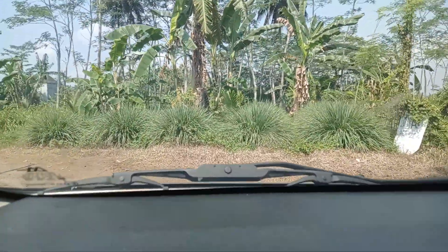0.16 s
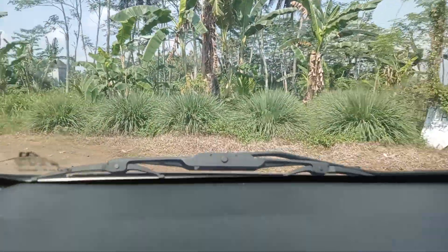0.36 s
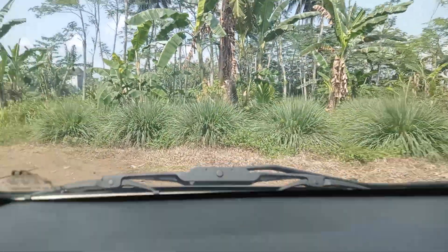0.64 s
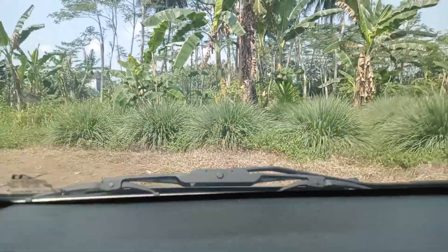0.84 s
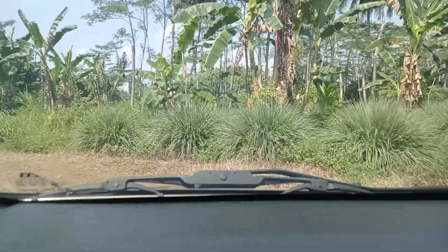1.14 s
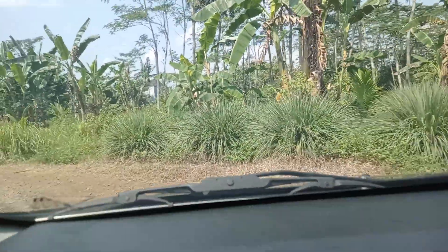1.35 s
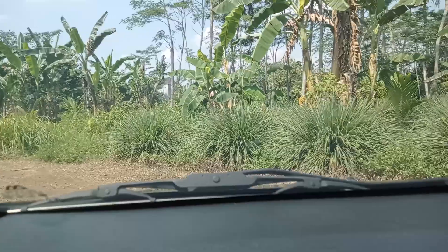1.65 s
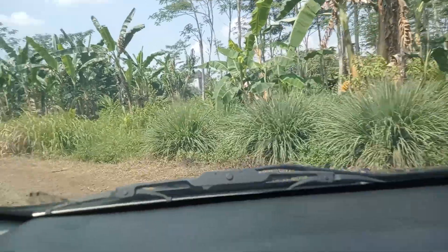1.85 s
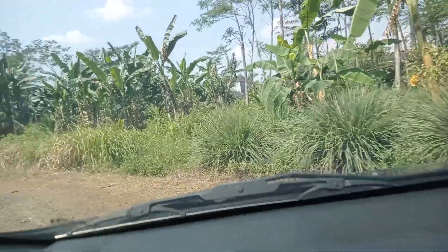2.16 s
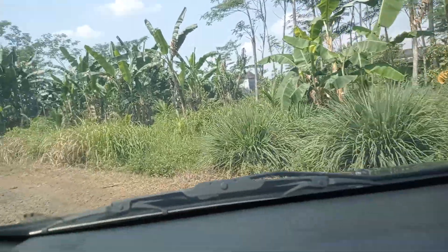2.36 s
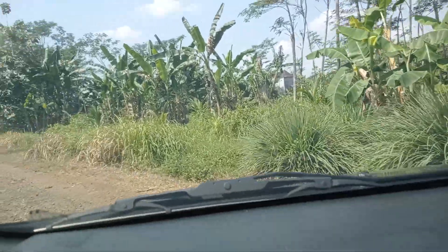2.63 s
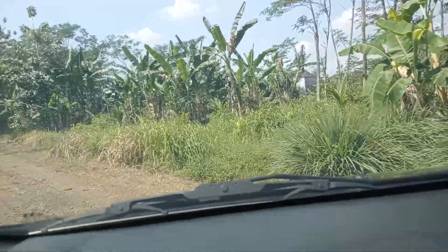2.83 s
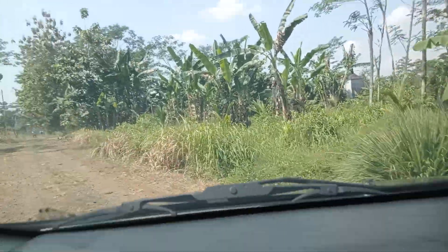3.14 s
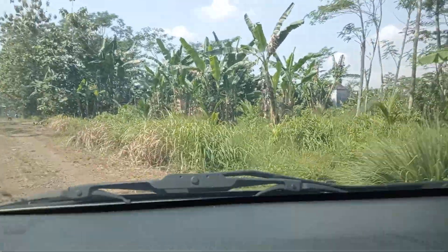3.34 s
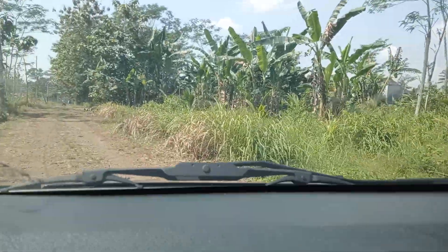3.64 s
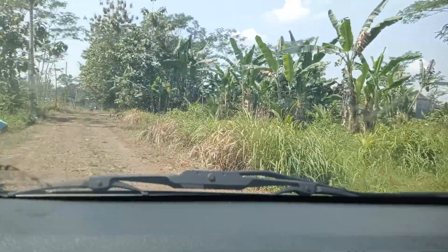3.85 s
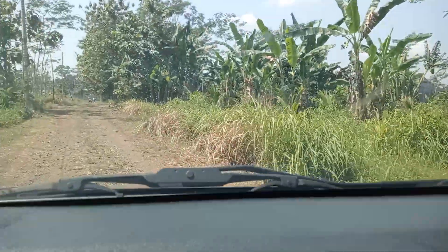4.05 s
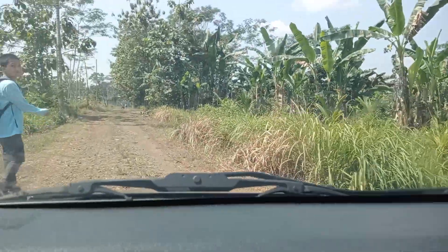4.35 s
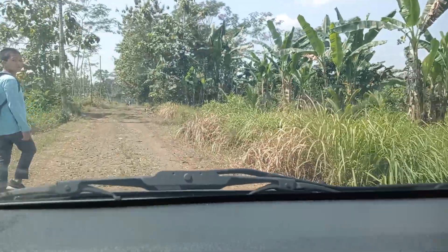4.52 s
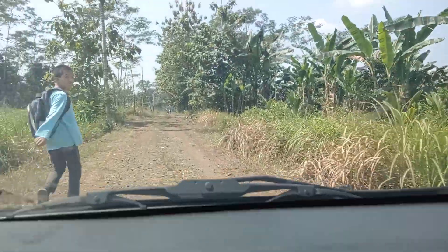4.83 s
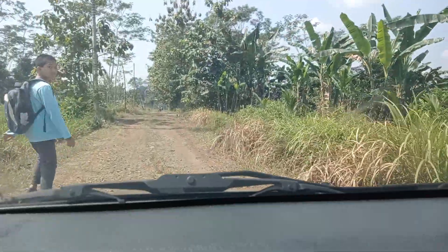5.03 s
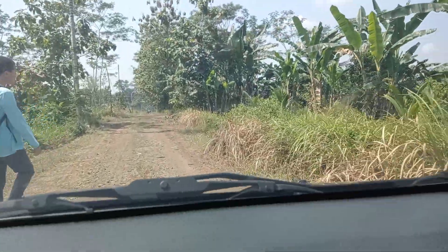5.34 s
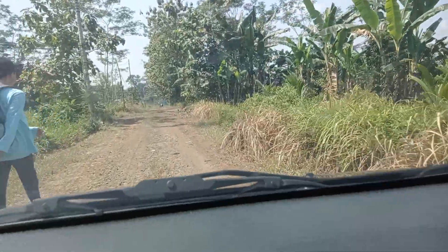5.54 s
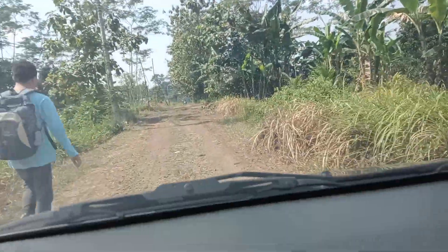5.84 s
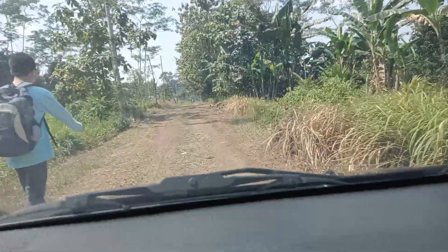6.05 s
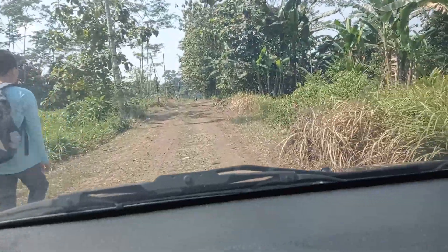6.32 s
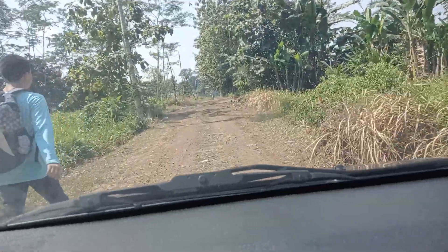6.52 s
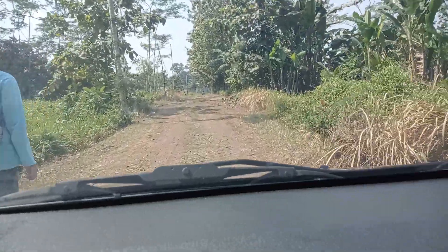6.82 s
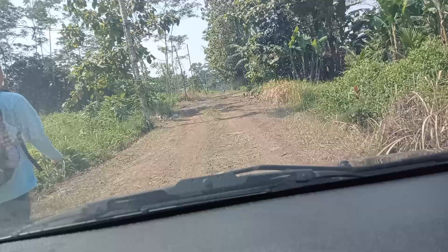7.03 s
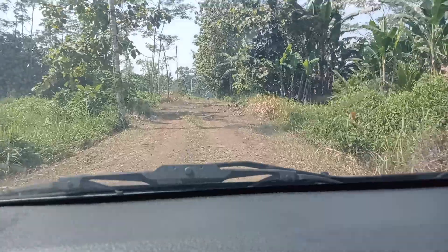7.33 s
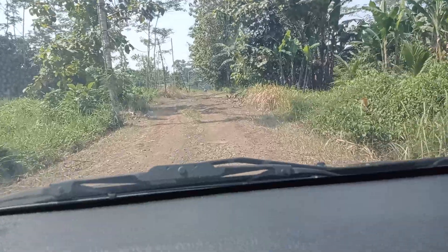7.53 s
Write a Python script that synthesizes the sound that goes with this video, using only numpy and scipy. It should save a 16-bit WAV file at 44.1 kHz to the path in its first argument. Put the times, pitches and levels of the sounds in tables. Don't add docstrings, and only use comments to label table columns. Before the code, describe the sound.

Slow car interior on a stony track: boomy body rumble and humming dashboard, crackling gravel, dull knocks, plastic trim ticks and small bright clinks.

```python
import sys
import numpy as np
from scipy import signal
from scipy.fft import rfft, irfft, next_fast_len
from scipy.io import wavfile
from scipy.ndimage import uniform_filter1d

SR = 44100
rng = np.random.default_rng(int(sys.argv[2]) if len(sys.argv) > 2 else 0)


def log_audio(samples):
    frames = np.atleast_2d(samples).T
    limited = np.clip(frames, -1, 1)
    pcm = np.round(limited * 32767).astype(np.int16)
    wavfile.write(sys.argv[1], SR, pcm)


def field_ratio(decibels):
    return 10 ** (np.asarray(decibels, dtype=float) / 20)


N = 338582
RUN_IN = 4096

# time in seconds, roughness as body shake in dB,
# loose grit as crunch in dB.
ROAD = [(0.0, -39, -56.5), (0.45, -34, -54.5), (0.83, -40.5, -55.5), (1.2, -31.5, -56), (1.6, -39, -54.5),
        (2.3, -42.5, -55), (2.9, -48, -56), (3.2, -45, -58), (3.48, -43, -53), (3.68, -36, -52),
        (4.3, -31, -51.5), (4.5, -31.5, -54), (4.83, -35.5, -49), (5.1, -30.5, -51.5), (6.2, -34, -53.5),
        (6.5, -35, -52.5), (7.08, -29.5, -52), (7.68, -29.5, -52.5)]


def rms_one(x):
    return x / np.sqrt(np.mean(x ** 2) + 1e-20)


def in_time(rows):
    s, *columns = np.transpose(rows)
    return [np.interp(np.arange(N) / SR, s, c) for c in columns]


def drift(rate):
    r = np.exp(-80 * np.pi * rate / SR)
    white = rng.standard_normal(N // 40 + 2002)
    slow = signal.lfilter([1], [1, -2 * r, r * r], white)[2000:]
    return np.interp(np.arange(N) / 40, np.arange(len(slow)), rms_one(slow))


def low_pass(x, hz):
    return signal.sosfilt(signal.butter(4, hz, "low", fs=SR, output="sos"), x)


def band(x, low_hz, high_hz):
    sos = signal.butter(2, [low_hz, min(high_hz, .49 * SR)], "band", fs=SR, output="sos")
    return signal.sosfilt(sos, np.append(x[-RUN_IN:], x))[RUN_IN:]


def resonate(x, hz, width_hz):
    r = np.exp(-np.pi * width_hz / SR)
    top = np.array([1, 0, -1]) * (1 - r * r) / 2
    return signal.lfilter(top, [1, -2 * r * np.cos(2 * np.pi * hz / SR), r * r], x)


def colour(x, spectrum):
    hz, level_db = np.transpose(spectrum)
    size = next_fast_len(N)
    grid = np.maximum(np.arange(size // 2 + 1) * SR / size, 1)
    gain = field_ratio(np.interp(np.log(grid), np.log(hz), level_db))
    return irfft(rfft(x, size) * gain, size)[:N]


def patchy_bands(spectrum, whites, patchy_db, flicker):
    whites = [colour(white, spectrum) for white in whites]
    lowest, highest = spectrum[0][0], spectrum[-1][0]
    edges = lowest * 2 ** np.arange(0, np.log2(highest / lowest) + .4, .5)
    together = drift(flicker)
    for k, (low, high) in enumerate(zip(edges, edges[1:])):
        if low < .45 * SR:
            patches = field_ratio(patchy_db * (0.14 * together + drift(flicker)))
            yield np.sqrt(low * high), patches * band(whites[k % 2], low, high)


def grains(per_s, spread_db):
    sizes = field_ratio(spread_db * np.minimum(rng.exponential(1, N), 5)) * rng.choice([-1, 1], N)
    return rms_one(sizes * (rng.random(N) < per_s / SR))


def bursts(times, peak_db, t60, rise_s):
    out = np.zeros(N)
    for s, db, decay in zip(times, peak_db, t60):
        at = int(s * SR)
        t = np.arange(min(int(.3 * SR), N - at)) / SR
        out[at:at + len(t)] += field_ratio(db - 60 * t / max(decay, .01)) * (1 - np.exp(-t / rise_s))
    return out


def struck(rows, width_hz, gain_db):
    out, shudder = np.zeros(N), rng.standard_normal((len(rows), SR // 5))
    fall = np.arange(SR // 5) / SR
    for (s, db, hz, t60), noise in zip(rows, shudder):
        push = noise * field_ratio(-60 * fall / max(t60, .01))
        ring = resonate(resonate(push, hz, width_hz), hz, 2.7 * width_hz)
        at = int(s * SR)
        out[at:at + len(ring)] += field_ratio(db + gain_db) * (ring / np.abs(ring).max())[:N - at]
    return out


def heaves(times, peak_db, lengths):
    t = np.arange(0, N + 32, 32) / SR
    power = sum(field_ratio(db) ** 2 * np.exp(-2 * np.abs(t - s) / max(length, .01))
                for s, db, length in zip(times, peak_db, lengths))
    return np.interp(np.arange(N) / SR, t, power)


def steadied(x, share, seconds):
    width = max(int(seconds * SR), 8)
    power = uniform_filter1d(uniform_filter1d(rms_one(x) ** 2, width), width)
    return rms_one(x / (power + 0.042) ** (share / 2))


def engine_hum():
    # note in Hz, width in Hz, level in dB rms.
    hum_notes = [(77.3, 26, -42.5), (208.2, 28, -50), (322.5, 32, -60), (536, 33, -63), (620, 41, -59.5),
                 (1110, 9.7, -74), (1788, 59, -68), (994, 30, -72), (2100, 66, -66.5), (3653, 78, -75),
                 (5500, 470, -82.5)]
    load_db = uniform_filter1d(in_time(ROAD)[1], size=SR // 2)
    white = rng.standard_normal(N)
    lines = np.zeros(N)
    for hz, width, db in hum_notes:
        lines += field_ratio(db) * rms_one(resonate(resonate(white, hz, width), hz, width))
    return lines * field_ratio(1.17 * (load_db - load_db.mean()))


def brushing():
    # start in seconds, length in seconds, level in dB rms, dullness in dB.
    swishes = [(0.28, 0.11, -65.5, -12), (1.074, 0.012, -62.5, 16.5), (1.083, 0.059, -70.5, 12),
               (1.321, 0.037, -71, 13), (1.434, 0.011, -64, -13), (5.2, 0.46, -76, -6),
               (2.1, 0.52, -76.5, -3), (1.698, .45, -76.5, -9), (2.663, 0.056, -72, 6),
               (3.73, 0.44, -69.5, 7), (4.16, 0.29, -67.5, 0), (4.62, 0.52, -70, -2),
               (6.552, 0.2, -69.5, 0), (6.988, 0.14, -67, 10), (5.923, 0.18, -63, -4),
               (6.825, 0.04, -65, 8), (6.945, 0.027, -59, 10)]
    white, out = rng.standard_normal(N), np.zeros(N)
    bright = rms_one(band(white, 6000, 12300) + 3.2 * resonate(white, 9200, width_hz=440))
    dull = rms_one(band(white, 1500, 3400))
    for s, length, db, dull_db in swishes:
        stroke = np.sin(np.pi * np.clip((np.arange(N) / SR - s) / length, 0, 1)) ** 0.21
        out += field_ratio(db) * stroke * (bright + field_ratio(dull_db) * dull)
    return out


def trim_ticks():
    # start in seconds, peak in dB, body relative to it in dB.
    tick_rows = [(0.1634, -50, 1), (0.3017, -44, 1), (0.4767, -54, 3), (1.076, -39, -20),
                 (1.5662, -53.5, 5), (1.6171, -51, 5), (1.8073, -50, 2), (1.8765, -51, 4),
                 (1.9764, -45, -1), (2.0287, -49, -23), (2.142, -51, -8), (3.235, -50, -20),
                 (4.0017, -52, -29), (4.146, -46, -17), (4.215, -46, -7), (4.255, -50, 1),
                 (4.317, -41, -22), (4.349, -41, -3), (4.4632, -47, 0), (4.19, -52, -9), (4.238, -50, -3),
                 (4.28, -51, -6), (4.37, -50, -1), (4.386, -54, -9), (0.573, -62, -6), (0.615, -60, 0),
                 (4.4991, -54, 2), (4.8857, -50, -7), (5.0269, -48, -14), (5.5548, -57, -9),
                 (5.7388, -62, -21), (5.9478, -58, 14), (6.4591, -56, -9), (6.5409, -53, 5),
                 (6.6178, -52, 7), (6.858, -57, 13)]
    s, db, body_db = np.transpose(tick_rows)
    stray = np.sort(rng.uniform(0, N / SR - .1, size=34))
    stray_db = -62.5 + 2.9 * np.minimum(rng.exponential(1, stray.shape), 2)
    s, db = np.append(s, stray), np.append(db, stray_db)
    body_db = np.append(body_db, rng.normal(-10.0, 3.2, stray.shape))
    t60 = 0.063 * field_ratio(2.5 * rng.standard_normal(s.shape))
    crackle = rng.standard_normal(N) + 0.28 * grains(4000, spread_db=-13.0)
    bright = rms_one(resonate(resonate(crackle, 9400, width_hz=1200), 9200, width_hz=2500))
    top = field_ratio(4) * rms_one(band(crackle, 13000, 14000))
    body = rms_one(band(crackle, 2700, 4800))
    out = bright * bursts(s, db, 0.8 * t60, rise_s=0.00063)
    out += top * bursts(s, db - 19, t60, rise_s=.001)
    out += body * bursts(s, db + body_db, t60, rise_s=0.001)
    return field_ratio(-8.5) * out


def pendant():
    # time in seconds, a millisecond before the touch, peak in dB, low ring relative to it in
    # dB.
    clink_rows = [(0.2435, -50, 4), (0.8389, -50.5, 2), (1.299, -54, 6.5), (1.4849, -68, 3),
                  (1.651, -58, 1), (3.296, -42, -0.5), (3.8267, -36.5, -0.5), (3.9153, -53, -15),
                  (4.3977, -35.5, -2), (4.4277, -61, 7), (4.6526, -52, -6), (4.9337, -43.5, 8),
                  (5.638, -46, 2), (6.302, -61, 5), (7.226, -49, 4.5), (7.3643, -56.5, 5.5)]
    # pitch in Hz, level in dB, t60 in seconds.
    metal_modes = [(3180, -15, 0.087), (3300, 0.5, 0.053), (3640, 7, 0.053), (3870, -10, 0.056),
                   (4410, -21, 0.052), (5760, -9, 0.042), (7160, -22, 0.032), (7640, -26, .04),
                   (7740, 2, 0.026), (7950, 2, 0.026), (8270, 6.5, 0.024), (8400, -13, .025),
                   (9600, 0, 0.019), (10300, -9, 0.018)]
    s, db, low_db = np.transpose(clink_rows)
    s = s + 0.001014
    chance = np.clip(rng.standard_normal((len(s), len(metal_modes))), -1.2, 1.2)
    chatter, white = grains(1500, spread_db=2.5), rng.standard_normal(N)
    out, decay = np.zeros(N), np.full(len(s), .05)
    for k, (hz, mode_db, t60) in enumerate(metal_modes):
        strength_db = db + low_db * (hz < 5000) + mode_db + 2.5 * chance[:, k]
        clicks = np.roll(chatter, 977 * k) * bursts(s, strength_db - 25, 1.4 * decay, rise_s=0.0001)
        clicks += 1e-18
        clicks[(s * SR).astype(int)] += field_ratio(strength_db - 7.5)
        r, w = field_ratio(-60 / (0.33 * t60 * SR)), 2 * np.pi * hz / SR
        out += (-1) ** k * signal.lfilter([0, np.sin(w)], [1, -2 * r * np.cos(w), r * r], clicks)
    crack_db = -64 + 0.6 * (db - db.mean())
    crack = field_ratio(-2.0) * rms_one(band(white, 12000, 14500))
    scrape = field_ratio(-39) * rms_one(band(white, 1800, 8700))
    out += crack * bursts(s, crack_db, .7 * decay, rise_s=.0004)
    out += scrape * bursts(s, db + 0.38 * low_db, 0.78 * decay, rise_s=0.00046)
    return out


def pebbles():
    # start in seconds, peak in dB, note in Hz, t60 in seconds.
    pebble_hits = [(0.3032, -42.5, 3840, 0.11), (1.079, -34, 3300, 0.027), (5.9486, -34.5, 2170, 0.04),
                   (6.357, -31, 3570, 0.015), (6.8548, -40, 2150, 0.037), (2.05, -41, 1200, 0.05),
                   (3.505, -39, 3050, 0.03), (3.546, -38, 1800, 0.04), (4.28, -39, 1300, 0.04),
                   (4.885, -32, 2000, 0.048), (7.04, -50, 2300, 0.07), (7.08, -35.5, 1800, 0.13),
                   (7.64, -34.5, 1340, 0.19)]
    return struck(pebble_hits, width_hz=330, gain_db=-5.0)


def gravel():
    # start in seconds, peak in dB, note in Hz.
    stone_breaks = [(0.095, -59, 5000), (0.1256, -64, 5170), (0.162, -53, 5500), (0.5, -40, 2210),
                    (0.535, -44, 2200), (0.614, -48, 3630), (0.974, -31, 700), (1.077, -45, 2000),
                    (1.38, -38, 1150), (1.431, -35, 1100), (1.487, -38, 900), (1.57, -41, 2050),
                    (1.755, -51, 2050), (1.775, -48, 2500), (1.886, -44, 1900), (3.865, -34, 2120),
                    (3.96, -39, 640), (4.005, -35, 1700), (4.035, -32, 1650), (4.045, -38.5, 3380),
                    (4.155, -43, 640), (4.1894, -54, 5030), (4.258, -41, 2050), (4.29, -35, 1900),
                    (4.531, -37, 1410), (4.675, -37, 630), (4.998, -43, 700), (5.1906, -51, 4570),
                    (5.59, -49, 760), (5.6635, -42, 3620), (5.49, -41, 1200), (5.67, -48, 2100),
                    (5.715, -35, 2040), (5.74, -36, 2210), (4.775, -41, 2150), (4.815, -35, 2080),
                    (4.737, -37, 2030), (5.15, -43, 2000), (4.21, -48, 3660), (0.777, -44, 1000),
                    (0.938, -38, 1590), (1.455, -43, 2300), (1.535, -41, 2600), (2.545, -45, 2300),
                    (2.56, -42, 1500), (3.504, -37, 1300), (5.949, -40.5, 1400), (6.665, -39, 1500),
                    (5.795, -42, 640), (6.219, -38, 620), (6.527, -38.5, 650), (6.827, -44, 1900),
                    (6.99, -48, 1200), (7.03, -54, 2100), (7.065, -33.5, 630), (7.09, -35, 560),
                    (7.334, -49, 600), (7.452, -62, 5400), (7.657, -33, 2020)]
    s, db, hz = np.transpose(stone_breaks)
    t60 = np.full(len(s), 0.088)
    return struck(np.transpose([s, db, hz, t60]), width_hz=330, gain_db=-7.0)


def grit():
    # frequency in Hz, level in dB per Hz.
    crunch_colour = [(470, -1.5), (800, -1), (1040, -8.5), (1130, -8), (1480, -7), (1780, -4), (1960, -5),
                     (2120, -3.5), (2350, -7.5), (3710, -13), (4700, -23), (5550, -29.5), (6500, -64),
                     (8450, -57), (14300, -120)]
    # frequency in Hz, level in dB per Hz.
    dust_colour = [(4500, -38), (6000, -9), (6600, -13.5), (7400, -10.5), (8300, -8), (9000, -3.5),
                   (9500, -1.5), (10100, -6), (10900, -5.5), (12500, -5.5), (15400, -3), (17000, -8.5)]
    crunch_db = in_time(ROAD)[1]
    swing_db = crunch_db - crunch_db.mean()
    clumps = field_ratio(2.94 * drift(20.0))
    whites = [0.56 * rng.standard_normal(N) + .5 * clumps * grains(1500, spread_db=1.0)
              for side in range(2)]
    crunch = sum(x for hz, x in patchy_bands(crunch_colour, whites, patchy_db=2.0, flicker=20.0))
    dust = colour(rng.standard_normal(N) + 0.74 * whites[0], dust_colour)
    air = signal.sosfilt(signal.butter(4, 11000, "high", fs=SR, output="sos"), dust)
    hiss = low_pass(dust, 11000)
    hiss_db = -74 + 0.91 * swing_db + 1.8 * drift(28.0) + .8 * drift(3.0)
    air_db = -86 + 0.2 * swing_db + 2.2 * drift(6.2)
    return field_ratio(crunch_db) * rms_one(crunch) + field_ratio(hiss_db) * rms_one(hiss) + field_ratio(air_db) * rms_one(air)


def suspension():
    # start in seconds, peak in dB, brightness relative to it in dB, t60 in seconds.
    knock_rows = [(0.489, -36, -7, 0.054), (0.774, -40, -18, 0.19), (0.936, -28.5, -20, 0.08),
                  (1.45, -38.5, -18, 0.27), (1.53, -32.5, -11.5, 0.065), (1.567, -38, -10, 0.063),
                  (1.76, -45, -3, 0.077), (2.142, -40, -21, 0.21), (2.524, -47, -8, 0.2),
                  (3.5, -39, -18, 0.28), (3.74, -34.5, -7, 0.09), (3.837, -28.5, -15, 0.091),
                  (4.02, -25, -28, 0.12), (4.042, -24, -32, 0.12), (4.172, -46, -7, 0.12),
                  (4.277, -33, -17, 0.13), (4.297, -30.5, -22, 0.13), (4.749, -36, -14.5, 0.17),
                  (4.828, -40, -1, 0.049), (5.147, -32, -18, 0.065), (5.434, -23, -39, 0.15),
                  (5.454, -41, -14, 0.15), (5.714, -34, -16, 0.15), (5.826, -27, -31, 0.22),
                  (6.13, -36, -26, 0.2), (6.614, -31, -22, 0.095), (6.662, -23.5, -31, 0.062),
                  (6.951, -34, -30, 0.087), (7.223, -24.5, -28, 0.16), (7.242, -35.5, -14, 0.14)]
    # low edge in Hz, high edge in Hz, level in dB.
    knock_parts = [(228, 898, 5), (1030, 2280, 11.5), (111, 690, -5)]
    # start in seconds, peak in dB, note in Hz, t60 in seconds.
    hollow_notes = [(0.176, -44.5, 1230, 0.083), (0.9384, -35.5, 1030, 0.11), (1.5598, -42, 1120, 0.09),
                    (1.566, -37, 640, 0.11), (1.76, -43.5, 800, 0.04), (2.14, -30, 486, 0.037),
                    (3.8354, -37, 1040, 0.13), (3.8637, -41, 1110, 0.052), (5.7132, -43, 970, 0.13),
                    (6.9549, -36.5, 1160, 0.17), (7.223, -38, 1030, 0.26)]
    s, db, bright_db, t60 = np.transpose(knock_rows)
    panel_hz = 329 * (1 + 0.18 * rng.standard_normal(len(s)))
    shudder = rng.standard_normal(N) + 1.46 * grains(450, spread_db=1.5)
    panels, trim, thump = [field_ratio(level_db - 6.5) * rms_one(band(band(shudder, low, high), low, high))
                           for low, high, level_db in knock_parts]
    out = panels * bursts(s, db, 0.79 * t60, rise_s=0.012)
    out += trim * bursts(s, db + bright_db, 0.8 * t60, rise_s=0.0037)
    out += thump * bursts(s, db - 11, 2.2 * t60, rise_s=0.0049)
    out += (panels + 0.13 * trim) * bursts(s, db - 8.5, 0.12 * t60, rise_s=0.0022)
    out += struck(np.transpose([s, db, panel_hz, t60]), width_hz=170, gain_db=-2.5)
    out += struck(hollow_notes, width_hz=120, gain_db=-1.0)
    return low_pass(out, 3500)


def body_shell():
    # frequency in Hz, level in dB per Hz.
    shell_colour = [(11, -87), (18, -33), (58, 1.5), (82, 2), (199, -8), (262, -16.5), (338, -12),
                    (461, -24), (523, -26), (606, -25), (767, -31.5), (990, -42), (1050, -55),
                    (1130, -38.5), (1400, -47), (1820, -65), (3080, -120)]
    # deepest point in seconds, boom in dB, length in seconds.
    rut_rows = [(0.036, -27.5, 0.024), (0.164, -30, 0.032), (0.327, -28.5, 0.11), (0.39, -32.5, 0.024),
                (0.496, -23, 0.017), (0.538, -24.5, 0.024), (0.634, -27.5, 0.025), (0.725, -29, 0.022),
                (1.07, -27.5, 0.019), (1.273, -31.5, 0.021), (1.333, -33, 0.012), (1.39, -31.5, 0.025),
                (1.477, -27.5, 0.019), (1.709, -35, 0.021), (1.817, -32.5, 0.044), (1.9, -31.5, 0.037),
                (1.955, -32.5, 0.022), (1.999, -36, 0.02), (2.084, -33.5, 0.033), (2.399, -36, 0.022),
                (2.451, -39, 0.021), (2.697, -32.5, 0.028), (2.792, -34.5, 0.02), (2.944, -35.6, 0.021),
                (3.128, -33.5, 0.02), (3.167, -31.5, 0.033), (3.232, -31, 0.017), (3.536, -30.9, 0.019),
                (3.704, -27, 0.04), (3.773, -25.5, 0.023), (3.878, -25, 0.026), (3.976, -22, 0.021),
                (4.046, -26.5, 0.021), (4.119, -25, 0.033), (4.18, -26.8, 0.021), (4.272, -23.5, 0.028),
                (4.395, -26.5, 0.033), (4.448, -26, 0.023), (4.54, -29, 0.039), (4.638, -26, 0.016),
                (4.772, -27.5, 0.04), (4.867, -26.5, 0.022), (5.104, -27, 0.02), (5.161, -28.0, 0.02),
                (5.261, -26, 0.022), (5.44, -35, 0.017), (5.547, -20.5, 0.019), (5.855, -25, 0.028),
                (6.026, -26, 0.02), (6.126, -26, 0.031), (6.365, -30, 0.048), (6.572, -34, 0.026),
                (6.619, -30, 0.02), (6.745, -26.5, 0.016), (6.8, -34, 0.021), (6.97, -28.5, 0.025),
                (7.028, -23, 0.022), (7.075, -22, 0.019), (7.386, -29.3, 0.015), (7.667, -25, 0.027)]
    # top in seconds, floor pan in dB, panels relative to it in dB,
    # length in seconds.
    stone_rows = [(0.16, -35, -5, 0.03), (0.243, -28.5, -16.0, 0.025), (0.531, -29, -24, 0.052),
                  (1.011, -28.5, -13, 0.026), (1.098, -29.4, -22, 0.015), (1.203, -33.5, -22, 0.017),
                  (1.538, -30.5, -12.4, 0.02), (1.66, -38, -18, 0.032), (1.9, -35, -6, 0.028),
                  (2.743, -41, -3, 0.022), (2.874, -34.5, -11, 0.021), (3.17, -40, -13.6, 0.033),
                  (3.271, -33, -13, 0.019), (3.524, -31.5, -4, 0.027), (3.7, -38, -32, 0.02),
                  (3.791, -33.5, -14, 0.023), (3.837, -24.5, -12, 0.013), (3.886, -27, -6, 0.043),
                  (3.972, -32, -16, 0.02), (4.035, -28.5, -10, 0.048), (4.32, -29.5, -5, 0.042),
                  (4.41, -35, -12, 0.056), (4.528, -33, -8, 0.013), (4.57, -39, -14, 0.013),
                  (4.83, -29, -10.5, 0.036), (4.932, -28.5, -7.5, 0.017), (5.105, -34, -13, 0.017),
                  (5.153, -30.5, -20, 0.019), (5.374, -41, -17, 0.017), (5.445, -33.5, -16, 0.017),
                  (5.48, -34, -14, 0.02), (5.546, -39, -4, 0.039), (5.767, -25.5, -11, 0.018),
                  (5.843, -23.5, -8.5, 0.034), (5.992, -26, -23, 0.016), (6.08, -28.5, -25, 0.021),
                  (6.15, -26.5, -19, 0.022), (6.318, -33.5, -7, 0.018), (6.474, -34, -9, 0.02),
                  (6.597, -29.5, -8, 0.023), (6.638, -33, -10.5, 0.021), (6.684, -21, -3, 0.024),
                  (6.811, -26.5, -16.8, 0.023), (6.924, -23, -16.3, 0.018), (7, -33, -10, 0.022),
                  (7.067, -31, -9.5, 0.026), (7.125, -34.5, -5, 0.022), (7.259, -27.9, -10.0, 0.02),
                  (7.548, -34.5, 1, 0.029), (7.638, -29.5, -2.5, 0.048)]
    # offset in dB, share of the shake's swing
    shell_db, shell_follows = (-1.5, -3, -8.5), (0.64, 0.51, 0.63)
    steady, steady_s = (0.74, 0.89, 0.18), (0.019, 0.013, 0.011)
    parts = np.zeros((3, N))
    jolts = np.abs(grains(60, spread_db=2.5))
    jolts = signal.lfilter([1], [1, -field_ratio(-60 / (.1 * SR))], jolts)
    for _ in range(2):
        jolts = uniform_filter1d(jolts, size=SR // 150)
    whites = rng.standard_normal((2, N))
    for hz, x in patchy_bands(shell_colour, whites, patchy_db=1.5, flicker=8.9):
        region = np.searchsorted([105, 270], hz)
        parts[region] += x * (1 + (0.33 + 0.46 * region) * jolts / jolts.mean())
    shake_db = in_time(ROAD)[0]
    power = np.array([field_ratio(db + follows * (shake_db + 39.0) - 38) ** 2
                      for db, follows in zip(shell_db, shell_follows)])
    s, db, panels_db, length = np.transpose(stone_rows)
    power[0] += heaves(*np.transpose(rut_rows))
    power[1] += heaves(s, db, length)
    power[2] += heaves(s, db + panels_db - 0.5, length)
    return sum(np.sqrt(p) * steadied(x, share, seconds)
               for p, x, share, seconds in zip(power, parts, steady, steady_s))


def scene():
    close = engine_hum() + brushing() + trim_ticks() + pendant()
    road = pebbles() + gravel() + grit() + suspension() + body_shell()
    return (close + road)[None]


def roll_off(x):
    return signal.sosfilt(signal.butter(12, 15630, fs=SR, output="sos"), x)


def record(dry):
    sos = signal.ellip(12, .5, 50, 15560, fs=SR, output="sos")
    led_in = np.pad(dry, [(0, 0), (RUN_IN, 0)], "reflect")
    cut = signal.sosfilt(sos, led_in)[:, RUN_IN:]
    return roll_off(cut)


dry = scene()
out = record(dry)
log_audio(out)
```